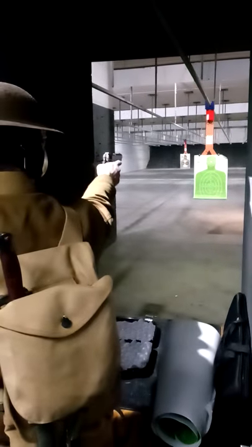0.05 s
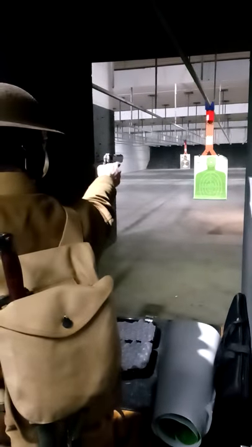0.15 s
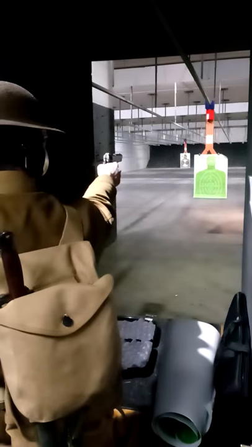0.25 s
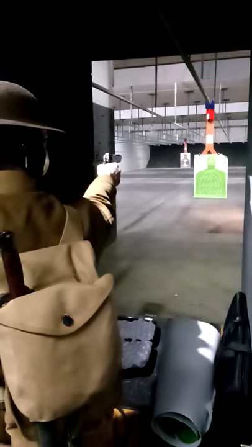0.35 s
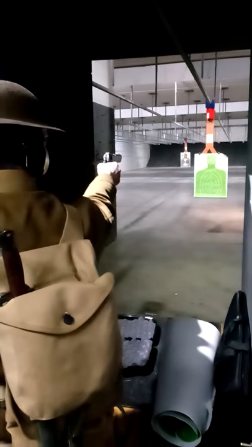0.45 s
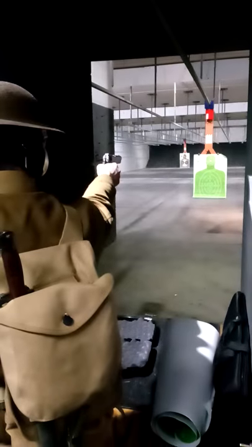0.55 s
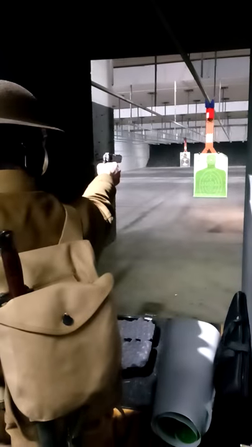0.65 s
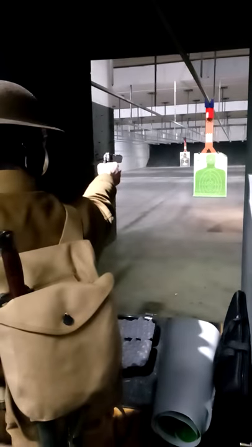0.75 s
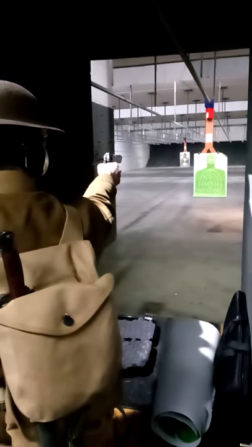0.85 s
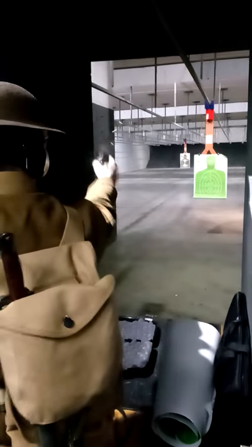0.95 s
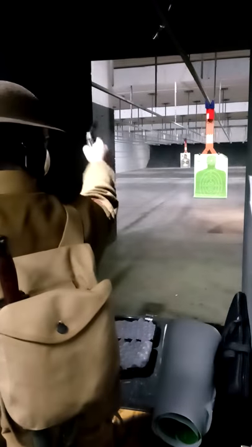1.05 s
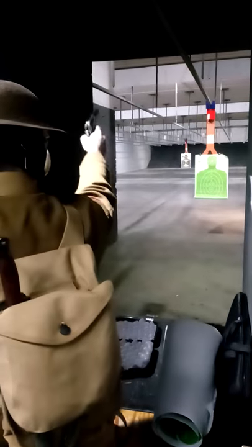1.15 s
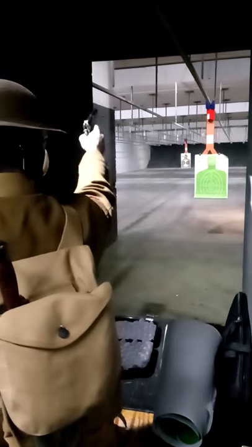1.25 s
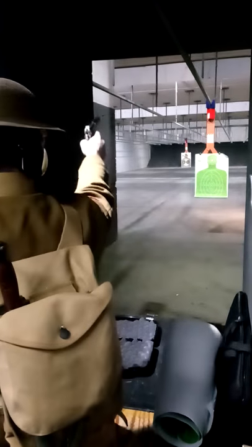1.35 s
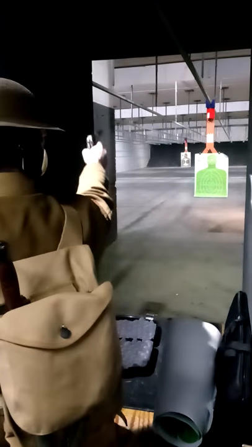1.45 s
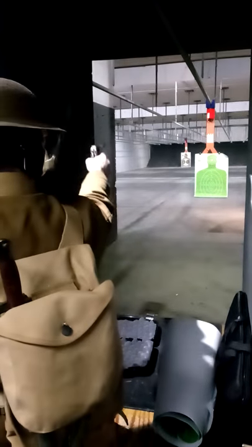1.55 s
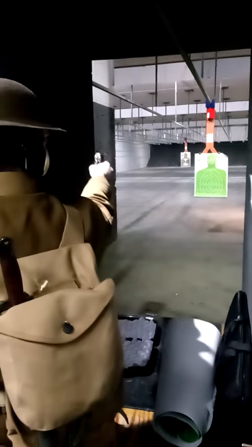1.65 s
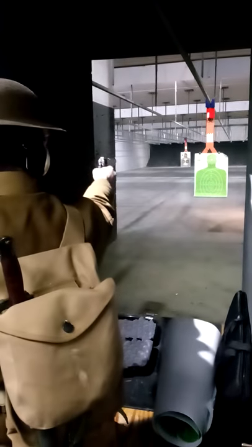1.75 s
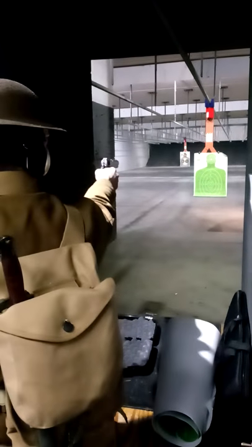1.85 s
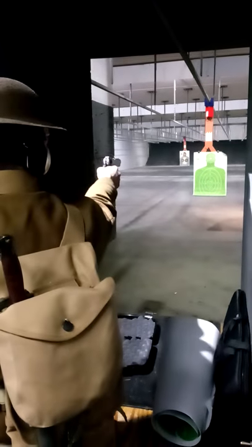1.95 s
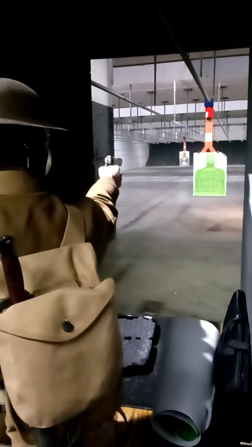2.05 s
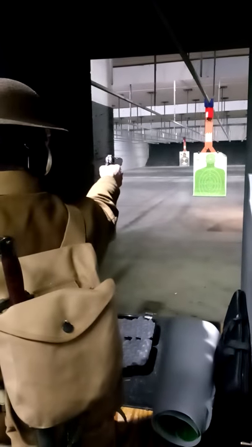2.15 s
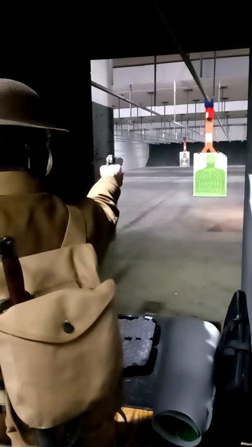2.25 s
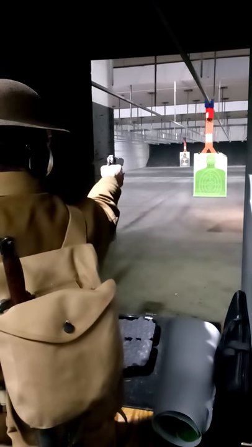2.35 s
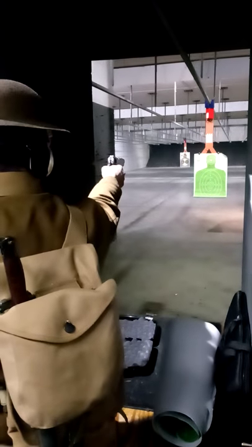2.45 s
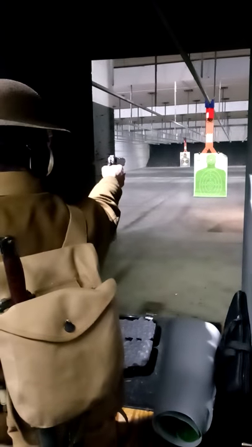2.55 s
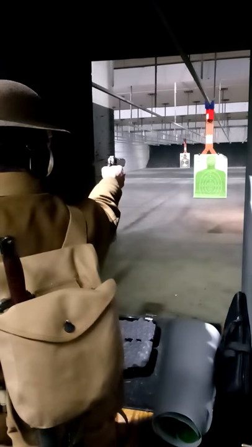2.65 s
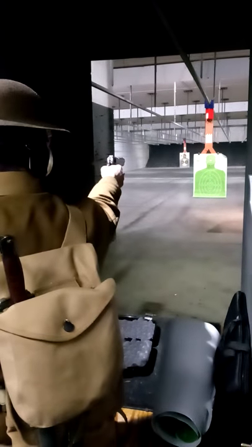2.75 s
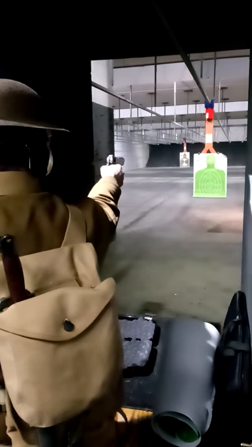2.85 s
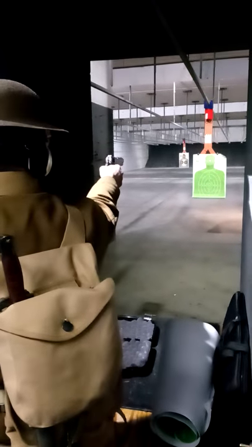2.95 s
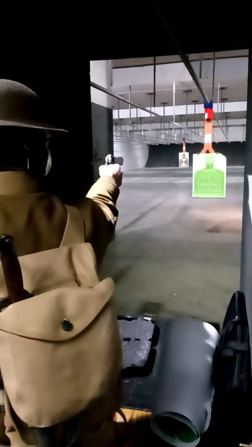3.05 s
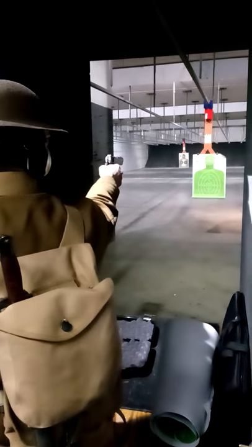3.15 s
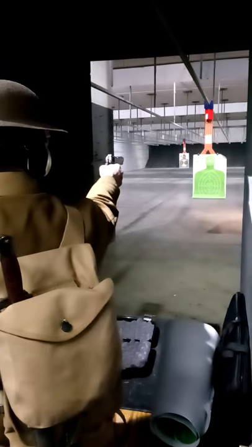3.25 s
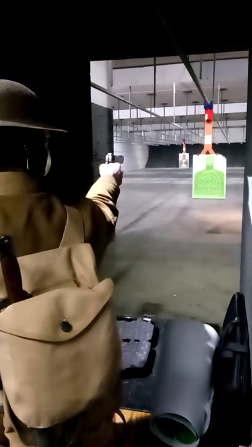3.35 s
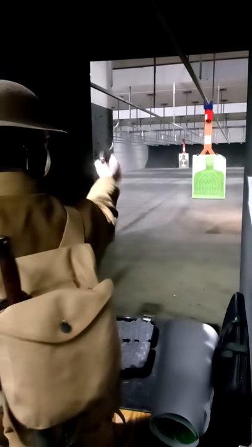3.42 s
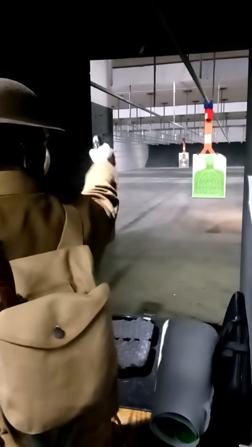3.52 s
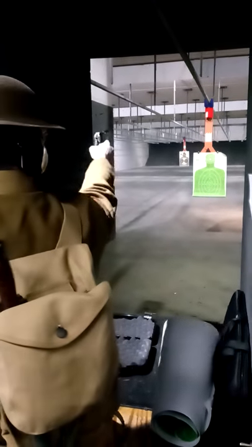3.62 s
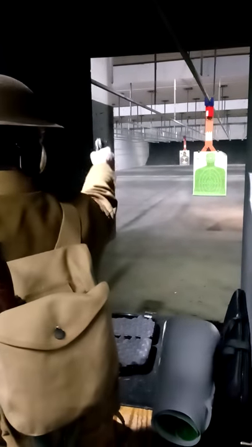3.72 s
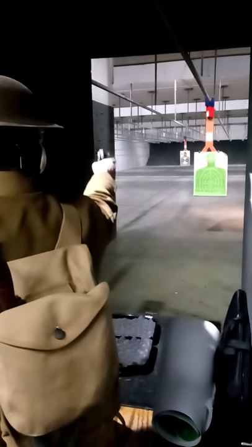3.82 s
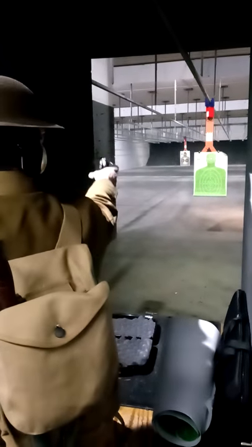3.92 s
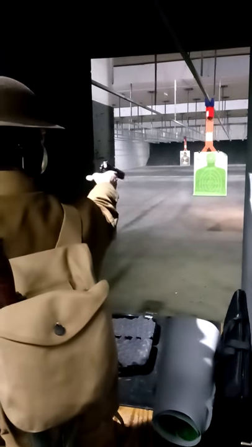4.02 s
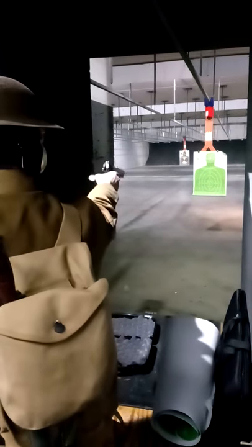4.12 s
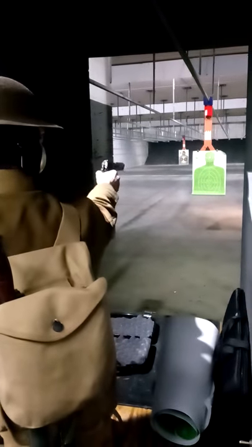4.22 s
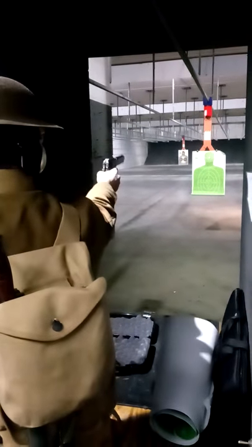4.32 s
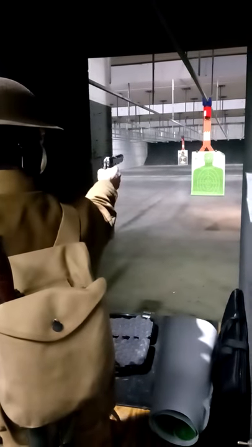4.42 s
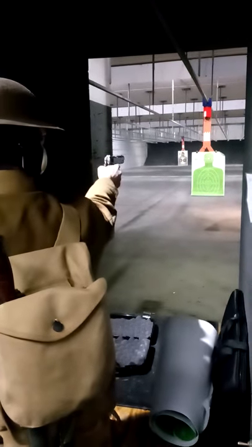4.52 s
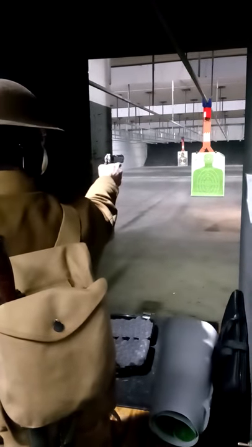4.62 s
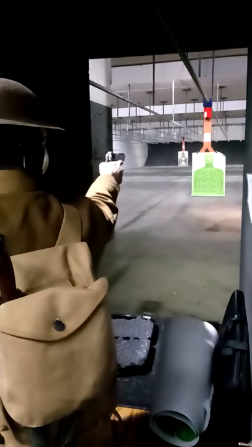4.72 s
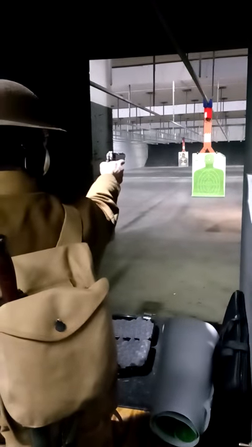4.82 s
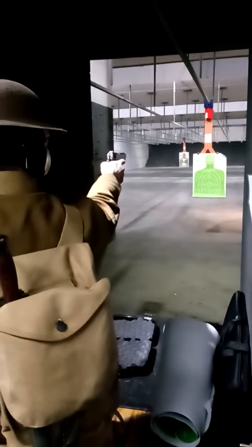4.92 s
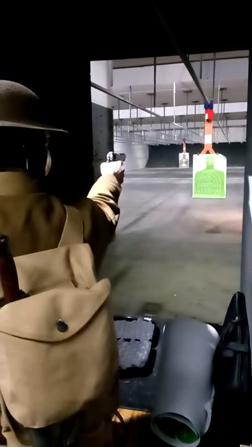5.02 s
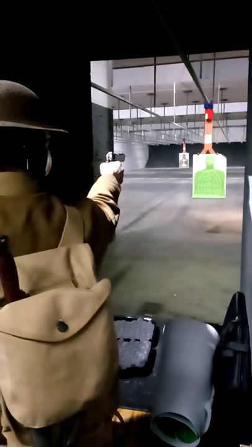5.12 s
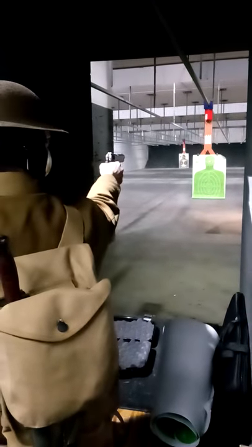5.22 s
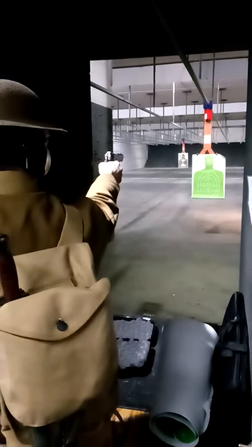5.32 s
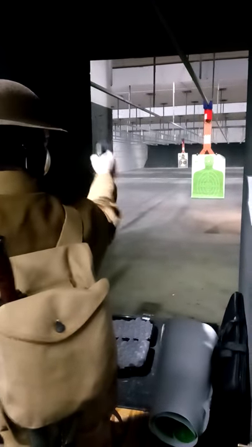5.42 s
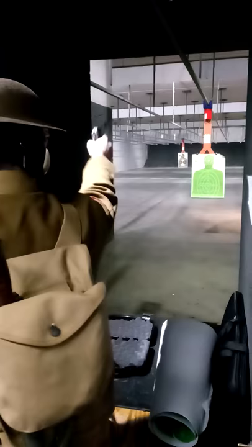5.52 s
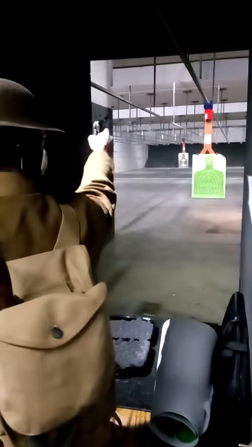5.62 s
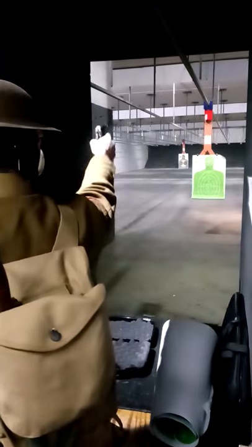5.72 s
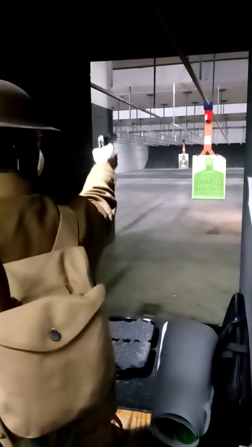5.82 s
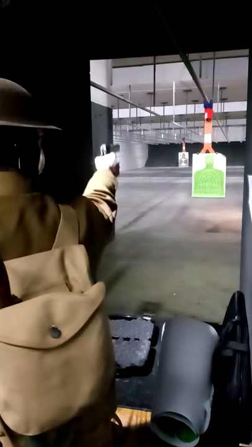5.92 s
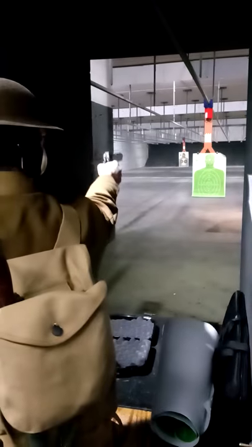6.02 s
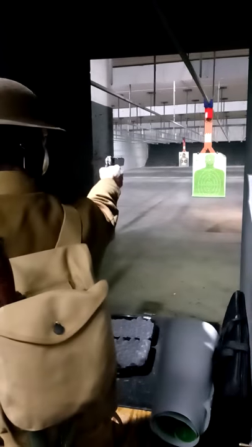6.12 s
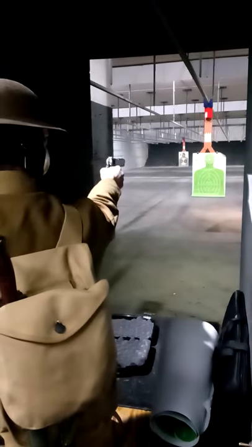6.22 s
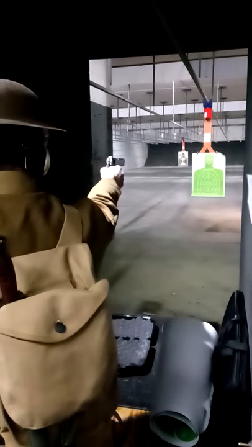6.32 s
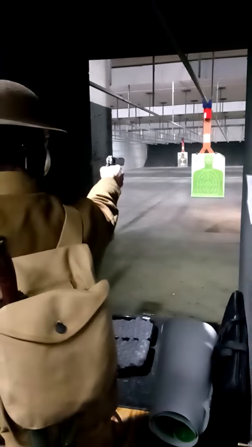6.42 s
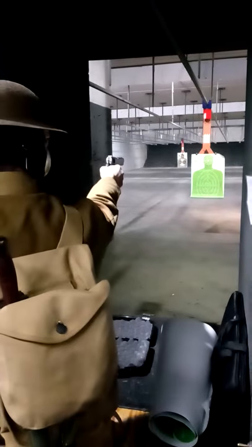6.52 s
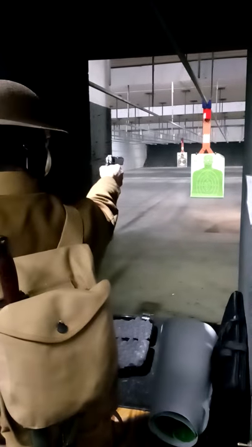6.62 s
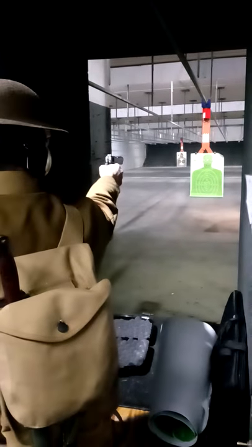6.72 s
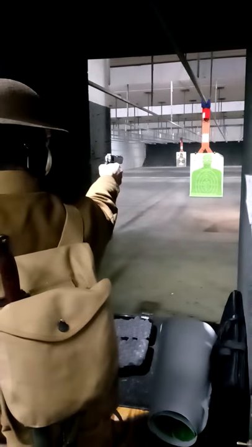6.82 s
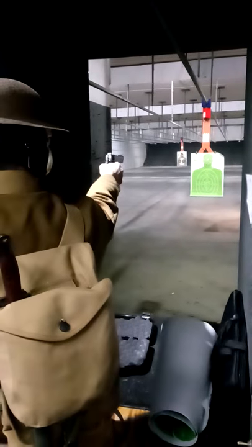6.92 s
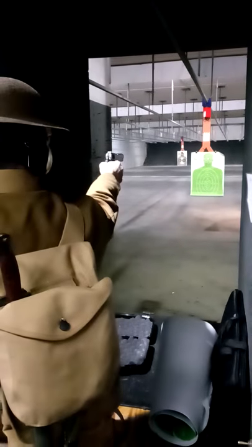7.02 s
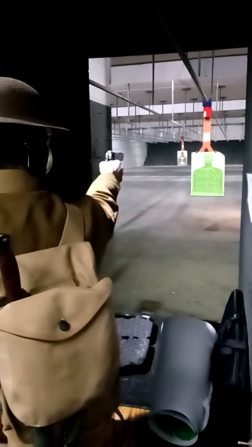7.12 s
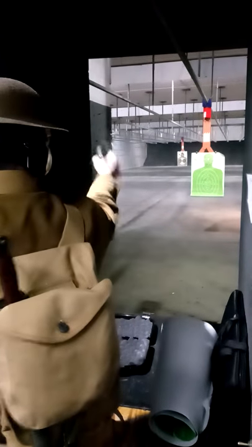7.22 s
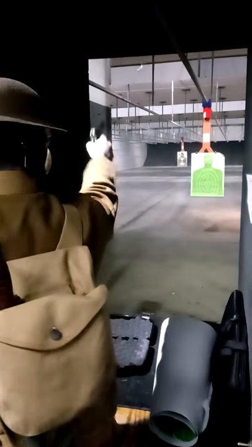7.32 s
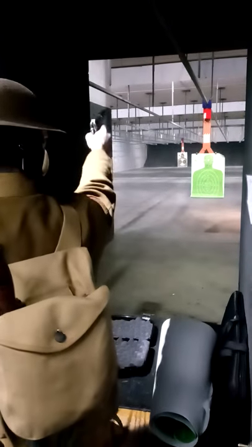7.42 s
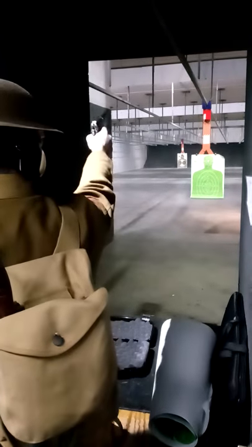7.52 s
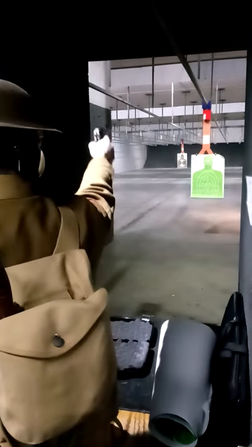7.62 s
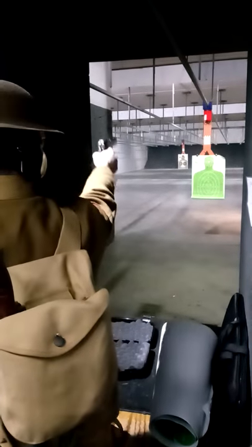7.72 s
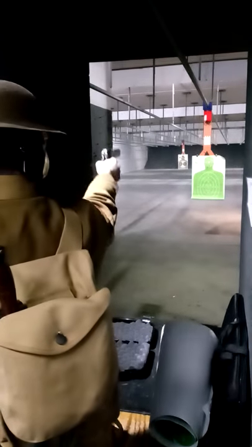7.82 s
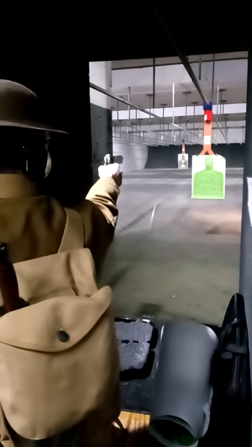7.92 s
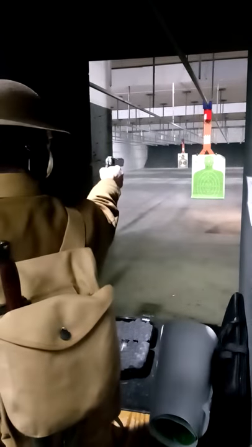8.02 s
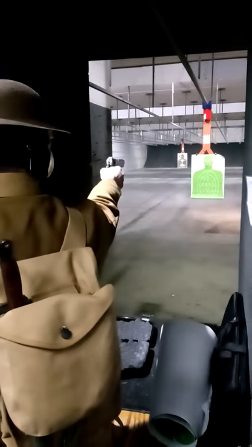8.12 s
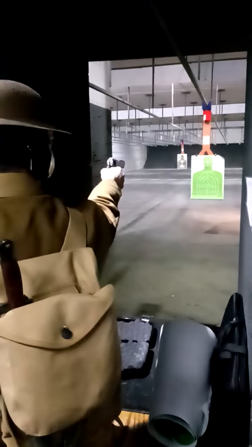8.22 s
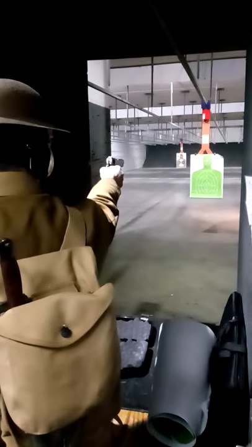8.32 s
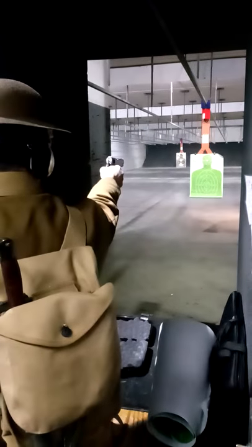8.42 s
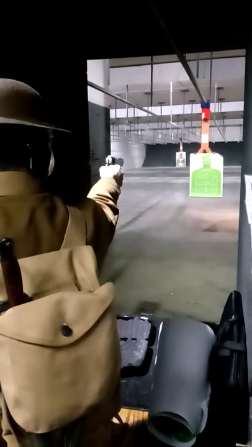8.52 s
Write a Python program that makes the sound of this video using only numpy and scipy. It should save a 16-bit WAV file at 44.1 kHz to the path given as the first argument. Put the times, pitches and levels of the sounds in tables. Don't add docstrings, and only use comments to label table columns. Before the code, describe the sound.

Loud pistol shots in a hard-walled indoor range, each clipping a small microphone, choking briefly, then roaring into long echoes, with neighbouring lanes firing.

```python
import sys
import numpy as np
from scipy import signal
from scipy.fft import rfft, irfft, next_fast_len
from scipy.io import wavfile
from scipy.ndimage import uniform_filter1d, minimum_filter1d

SR = 44100
rng = np.random.default_rng(int(sys.argv[2]) if len(sys.argv) > 2 else 0)


def ratio(d):
    e = np.asarray(d, float) / 20
    return 10 ** e


def store_pcm(level_fs):
    pcm = np.round(np.clip(level_fs, -1, 1) * 32767).astype(np.int16)
    wavfile.write(sys.argv[1], SR, np.atleast_2d(pcm).T)


N = 377496

# (frequency [Hz], density [dB per Hz])
VENT_SPECTRUM = [(15, -33.5), (25, -5.5), (55, 7), (76, -6), (109, -12.5), (153, -2), (219, -11.5),
                 (250, -13.5), (620, -20), (1790, -15.5), (2640, -24), (4270, -33), (5700, -38.5),
                 (6800, -54.5), (9000, -87)]
# (time [s], peak [dB], centre [Hz], T60 [s])
CASE_TICKS = [(2.455, -66, 7700, .15), (2.606, -57, 7750, 0.027), (2.752, -58, 7500, .025),
              (2.852, -41, 5550, 0.34), (4.274, -29, 5500, 0.074), (4.733, -44, 5180, 0.022),
              (5.363, -37, 5300, .053), (5.373, -42, 5400, .21), (5.374, -61, 7950, .073),
              (6.42, -32.5, 6200, .094), (6.421, -51, 11600, .017), (6.449, -47.5, 7500, .032),
              (7.985, -42, 5740, 0.13), (8.153, -26.5, 4800, .032), (8.153, -17, 2600, .046)]
# (time [s], level [dB], frequency [Hz])
CASE_RINGS = [(2.606, -62, 6700), (2.752, -69.5, 6800), (4.733, -38, 6660), (6.419, -48, 6570),
              (6.43, -43, 6500), (6.449, -51, 6430)]
# (time [s], level [dB], bright arrival [dB], rise [s])
FAR_SHOTS = [
    (1.897, -33.5, -21, 0.018),
    (1.94, -26.5, -7.5, 0.02),
    (1.98, -10.5, -5.5, 0.016),
    (2.09, -15.5, -7.5, 0.014),
    (6.66, -31, -31, 0.01),
    (6.705, -24, -19, 0.0059),
    (6.752, -9.5, -8.5, 0.0091),
    (6.86, -14, -38.5, 0.01),
]
# (frequency [Hz], density [dB per Hz])
FAR_SPECTRUM = [(30, -16.5), (150, -8), (500, 0.5), (1200, -3), (1800, -4), (2700, -2.5), (3300, -11.5),
                (5500, -22.5), (6800, -35.5), (8500, -56), (11000, -70)]
# (frequency [Hz], density [dB per Hz])
BAFFLE_SPECTRUM = [(800, -36.5), (1400, -17), (2000, -4.5), (2700, -1.5), (3200, -7), (4800, -19),
                   (7000, -25), (10500, -36.5), (12000, -54)]
# (frequency [Hz], T60 [s])
BAFFLE_T60 = [(1500, 0.96), (3000, 0.75), (6000, 0.59), (10000, .25)]
# (time [s], hall level [dB], first-walls level [dB], wall lag [s])
NEXT_SHOTS = [
    (1.398, 2.5, 14, .005),
    (2.882, 2, 9.5, 0.0093),
    (4.288, 2, 10.5, 0.0066),
    (7.033, 0, 11.5, 0.002),
]
# (frequency [Hz], density [dB per Hz])
WALL_SPECTRUM = [(40, -6.5), (150, -10.5), (800, 2), (1600, -7.5), (3500, -5.5), (5500, -19), (8000, -41),
                 (16000, -44)]
# (frequency [Hz], density [dB per Hz])
HALL_SPECTRUM = [(18, -44), (30, 8.5), (100, -10.5), (160, -7.5), (320, 0.5), (770, -2.5), (1070, -8.5),
                 (1420, -21), (2730, -20.5), (3900, -34.5), (5500, -55.5), (6600, -71.5), (8000, -80),
                 (11000, -130)]
# (frequency [Hz], T60 [s])
HALL_T60 = [(60, 3.5), (250, 3.87), (700, 3.59), (1500, 2.43), (3000, 1.945), (6000, 0.68), (10000, 1.2)]
# (blast [s], capsule freed [s], roar breaks through [s])
OWN_SHOTS = [
    (1.0018, 1.1474, 1.1543),
    (3.4727, 3.5943, 3.605),
    (5.4547, 5.6086, 5.6147),
    (7.2681, 7.4203, 7.4273),
]
# (hall level [dB], rebound size, rebound decay [s], leak at start [dB], leak at end [dB])
CAPSULE_JAMS = [
    (2.5, 0.75, 0.029, -64, -31),
    (2.5, 0.87, 0.01, -71, -21),
    (2.5, 6.4, 0.0051, -57, -35),
    (3, 1.8, 0.016, -69.5, -27.5),
]
# (lag [s], size, size of trailing echoes)
WALL_ECHOES = [
    (.0214, .24, 0),
    (.0178, .1, .01),
    (.0173, .16, .07),
    (.0179, .16, .07),
]
# (delay after wall echo [s], length [s])
ECHO_TRAIL = [(.006, .005), (.0185, .001)]
BOUNCES = [3.4759, 3.4771, 3.478, 3.4783]
DUCK_TIMES = [1.0018, 1.1474, 2.882, 4.288, 5.6086, 7.4203]
# (frequency [Hz], gain [dB])
MIC_COLOUR = [(300, -2.5), (800, 0.5), (3000, -1.5), (5000, -1), (6000, -10.5), (6900, -8.5), (8200, -4),
              (10500, 1.5), (13000, 1), (15600, 1.5)]

STOP = 0.8
JAMMED = 0.7


def along(points, hz):
    f, v = np.transpose(points)
    return np.interp(np.log(hz + 1), np.log(f + 1), v)


def add(track, start_s, x):
    part = track[round(start_s * SR):][:len(x)]
    part += x[:len(part)]


def rise(t, rise_s):
    return 1 - np.exp(-t / rise_s)


def roar(spectrum, count, at_s=0, t60=None, patchy_db=1.0):
    hz, t, z = signal.stft(rng.standard_normal(count + 1024), SR, nperseg=1024)
    field = uniform_filter1d(rng.standard_normal(z.shape), 8, 0)
    field = uniform_filter1d(field, 5, 1)
    colour = ratio(along(spectrum, hz))
    fall_db = 0 if t60 is None else -60 * (t - at_s) / along(t60, hz)[:, None]
    z = z * ratio(patchy_db * field / field.std() + fall_db) * colour[:, None]
    noise = signal.istft(z, SR, nperseg=1024)[1][:count]
    return noise / np.sqrt(np.mean(colour ** 2))


def ventilation():
    return ratio(-39.5) * roar(VENT_SPECTRUM, N, patchy_db=0.3)


def spent_cases():
    air = np.zeros(N)
    t = np.arange(SR // 5) / SR
    for start_s, peak_db, centre_hz, t60_s in CASE_TICKS:
        edges_hz = [0.8 * centre_hz, 1.25 * centre_hz]
        band = signal.butter(4, edges_hz, "bandpass", fs=SR, output="sos")
        impact = rng.standard_normal(len(t)) * ratio(-60 * t / t60_s)
        add(air, start_s, 2 * ratio(peak_db) * signal.sosfilt(band, impact))
    ring_t60_s = 0.21
    for start_s, level_db, hz in CASE_RINGS:
        add(air, start_s, ratio(level_db - 60 * t / ring_t60_s) * np.sin(2 * np.pi * hz * t))
    return air


def far_lanes():
    air, count = np.zeros(N), 3 * SR
    t = np.arange(count) / SR
    for start_s, level_db, bright_db, rise_s in FAR_SHOTS:
        onset = rise(t, rise_s)
        bright = roar(BAFFLE_SPECTRUM, count, 0, BAFFLE_T60, patchy_db=2.5)
        add(air, start_s, onset * ratio(bright_db) * bright)
        add(air, start_s, onset * ratio(level_db - 0.5) * roar(FAR_SPECTRUM, count, 0.25, HALL_T60))
    return air


def next_lanes():
    air, count = np.zeros(N), 3 * SR
    t = np.arange(count) / SR
    for start_s, hall_db, walls_db, lag_s in NEXT_SHOTS:
        hall = roar(HALL_SPECTRUM, count, 0.76, HALL_T60)
        add(air, start_s, rise(t, 0.0016) * ratio(hall_db - 17.5) * hall)
        walls = ratio(walls_db - 60 * t / 0.29) * roar(WALL_SPECTRUM, count, patchy_db=3)
        add(air, start_s + lag_s, rise(t, 0.00075) * walls)
    return air


def own_shots():
    air = np.zeros(N)
    for (blast_s, *_), (hall_db, *_) in zip(OWN_SHOTS, CAPSULE_JAMS):
        add(air, blast_s, ratio(hall_db - 16) * roar(HALL_SPECTRUM, 3 * SR, 0.77, HALL_T60))
    return air


def scene():
    return (ventilation() + spent_cases() + far_lanes() + next_lanes() + own_shots())[None]


def jammed_diaphragm(u):
    port = np.cos(2 * np.pi * 2300 * (u - 0.002))
    port += 0.8 * np.cos(2 * np.pi * 4800 * (u - 0.001)) * (u < 0.0013)
    growth = ratio(np.minimum(u / 0.00003 - 30, 12))
    rattle = (u < 0.0022) * growth * (port + 0.2 * rng.standard_normal(len(u)))
    hold = 1.5 * JAMMED * np.clip(u / 0.001 - 0.3, 0, 1)
    return np.clip(rattle - hold, -JAMMED, 1.6 * JAMMED)


def wall_pokes(out):
    pokes = [(bounce_s, 1.1, 0.00014) for bounce_s in BOUNCES]  # (time [s], size, length [s])
    for (blast_s, *_), (lag_s, size, trail_size) in zip(OWN_SHOTS, WALL_ECHOES):
        echo_s = blast_s + lag_s
        pokes.append((echo_s, size, 0.006))
        pokes += [(echo_s + after_s, trail_size, length_s) for after_s, length_s in ECHO_TRAIL]
    for start_s, size, length_s in pokes:
        u = np.arange(round(length_s * SR) + 2) / SR
        shiver = uniform_filter1d(rng.standard_normal(len(u)), 6)
        add(out, start_s, size * np.sin(np.pi * u / u[-1]) ** 0.3 * (1 + 0.2 * shiver))


def capsule(air):
    t = np.arange(N) / SR
    push = air.copy()
    for (*_, through_s), (_, size, decay_s, *_) in zip(OWN_SHOTS, CAPSULE_JAMS):
        push += size * np.exp(-np.abs(t - through_s) / decay_s) * (t >= through_s)
    out = push / (1 + np.abs(push / STOP) ** 24) ** (1 / 24)
    level = np.sqrt(np.abs(uniform_filter1d(air ** 2, 2048)) + 1e-9)
    for (blast_s, free_s, through_s), (*_, start_db, end_db) in zip(OWN_SHOTS, CAPSULE_JAMS):
        i, j = round(blast_s * SR), round(free_s * SR)
        u, jam_s = t[i:j] - blast_s, free_s - blast_s
        creep = STOP * np.sin(np.pi / 2 * np.clip((u - 0.03) / (jam_s - 0.03), 0, 1)) ** 2
        leak = ratio(start_db + (end_db - start_db) * u / jam_s) * np.clip((u - 0.025) / 0.012, 0, 1)
        seep = 1.18 * (air[i:j] - 0.37 * air[i - 2:j - 2]) / level[i:j]
        seep += ratio(-35.5) * rng.standard_normal(j - i)
        out[i:j] = jammed_diaphragm(u) + creep + leak * seep
        held = t[j:round(through_s * SR)] - free_s
        out[j:j + len(held)] = STOP - JAMMED * np.exp(-held / 0.00006)
    wall_pokes(out)
    return out


def microphone_response(x):
    m = next_fast_len(N + 8192)
    hz = np.fft.rfftfreq(m, 1 / SR)
    bass_cut = hz ** 2 / (hz ** 2 - 95 ** 2 - 44j * hz) * (hz - 105j) / (hz - 240j)
    cepstrum = irfft(np.log(ratio(along(MIC_COLOUR, hz))), m)
    fold = np.r_[1, np.full(m // 2 - 1, 2)]
    colour = np.exp(rfft(cepstrum[:m // 2] * fold, m))
    top = np.clip((15750 - hz) / 300 + 0.5, 0, 1) ** 2
    return irfft(rfft(x, m) * bass_cut * colour * top, m)[:N]


def gain_control(x):
    aim_db, rest_db, most_db = -13, 1, 18.5
    firmness, squeeze = 0.9, 0.15
    sense, ahead, hold = round(0.01 * SR), round(0.0083 * SR), round(0.066 * SR)
    climb_db_per_s = 23
    t = np.arange(N) / SR
    power = uniform_filter1d(x ** 2, sense, origin=(sense - 1) // 2)
    under_db = aim_db - 10 * np.log10(np.abs(power) + 1e-9)
    share = np.where(under_db > 0, firmness, squeeze)
    wanted = np.minimum(rest_db + share * under_db, most_db)
    early = np.r_[wanted[ahead:], wanted[-ahead:]]
    held = minimum_filter1d(early, hold, origin=(hold - 1) // 2)
    climb = climb_db_per_s * t
    gain_db = uniform_filter1d(np.minimum.accumulate(held - climb) + climb, ahead)
    for jump_s in DUCK_TIMES:
        gain_db -= 7 * np.clip((t - jump_s + 0.014) / 0.004, 0, 1) * (t < jump_s)
    return gain_db


def band_limit(x):
    return signal.sosfilt(signal.butter(12, 16610, fs=SR, output="sos"), x)


def record(dry):
    x = capsule(dry[0]) + ratio(-89.0) * rng.standard_normal(N)
    x = microphone_response(x)
    x = np.clip(ratio(gain_control(x)) * x, -1, 1)
    return band_limit(x[None])


dry = scene()
out = record(dry)
store_pcm(out)
```